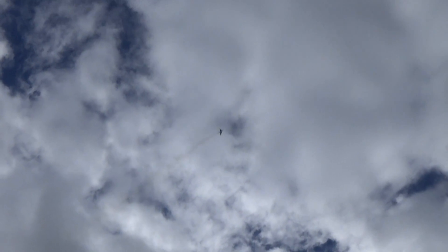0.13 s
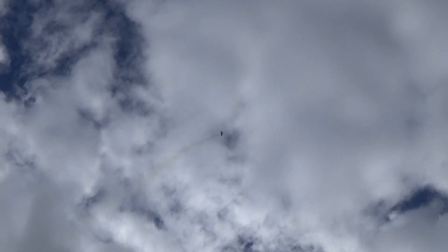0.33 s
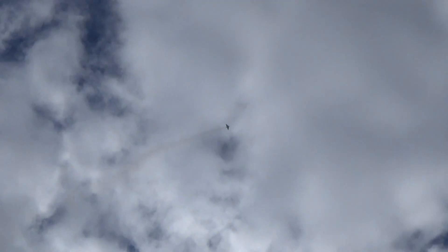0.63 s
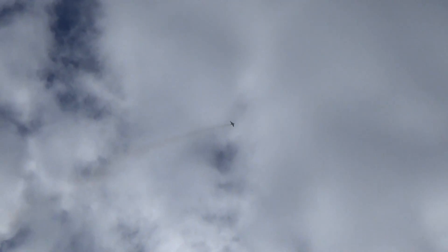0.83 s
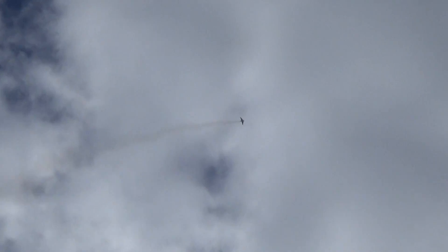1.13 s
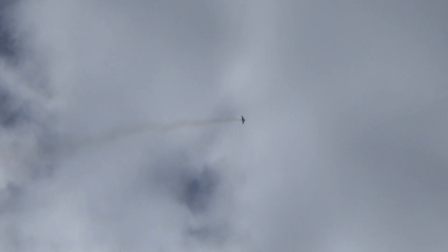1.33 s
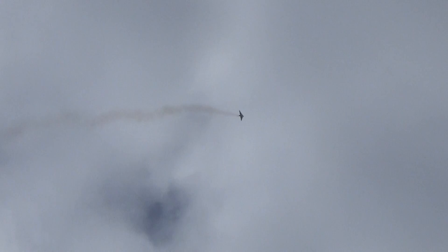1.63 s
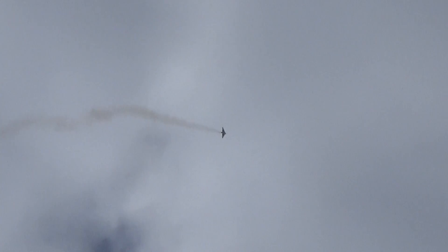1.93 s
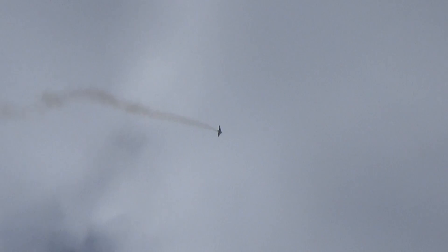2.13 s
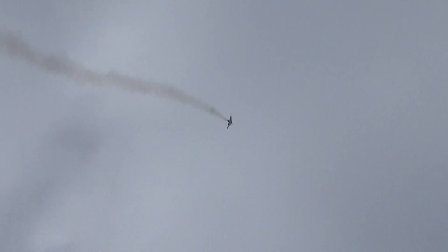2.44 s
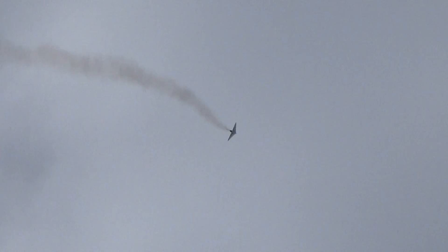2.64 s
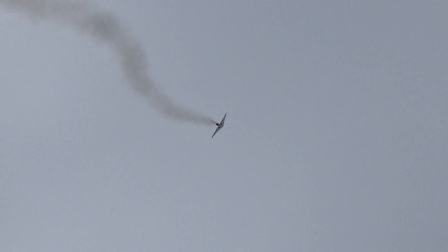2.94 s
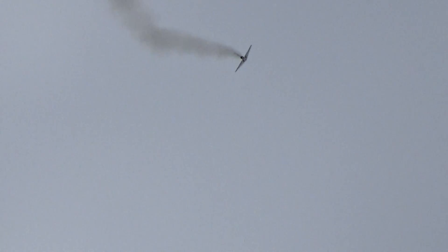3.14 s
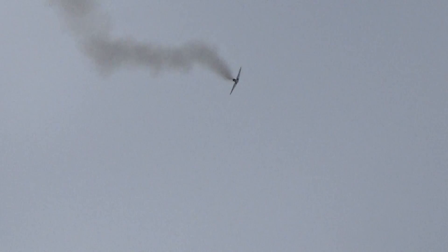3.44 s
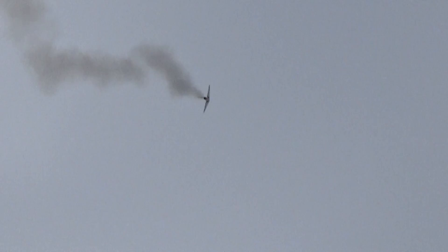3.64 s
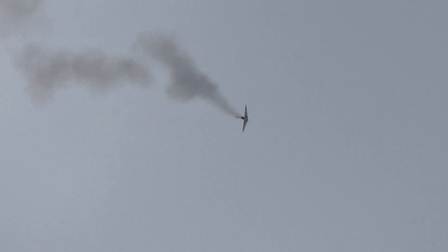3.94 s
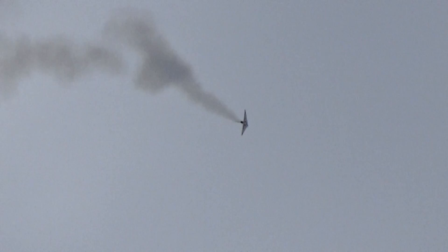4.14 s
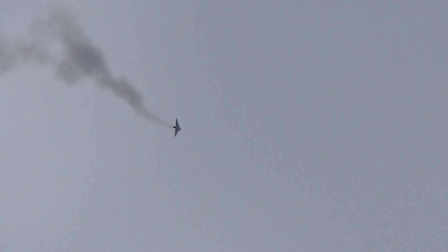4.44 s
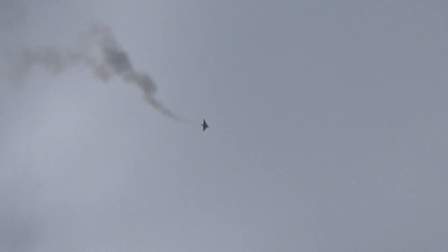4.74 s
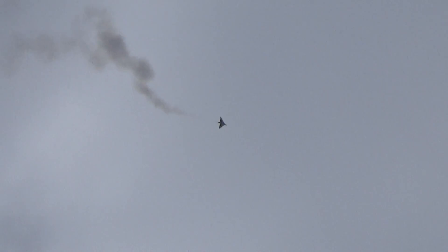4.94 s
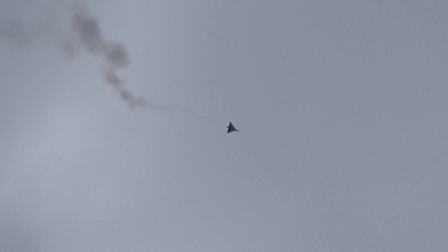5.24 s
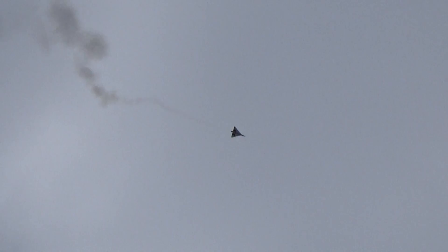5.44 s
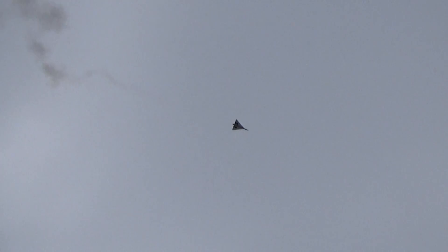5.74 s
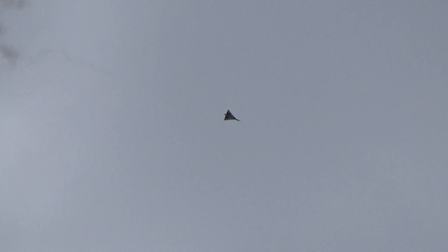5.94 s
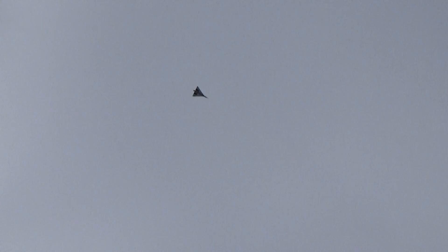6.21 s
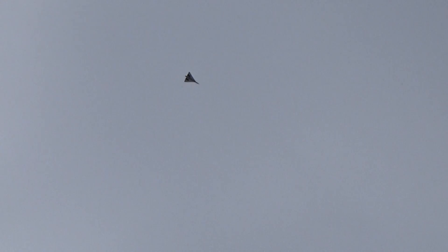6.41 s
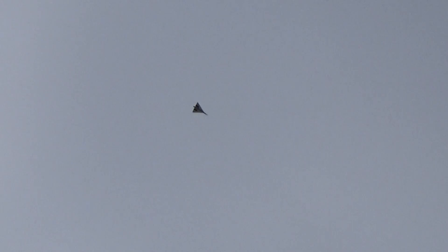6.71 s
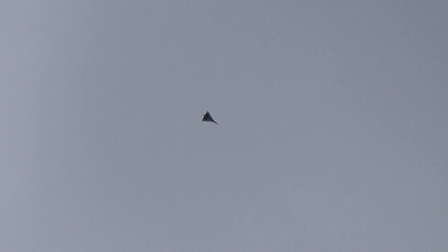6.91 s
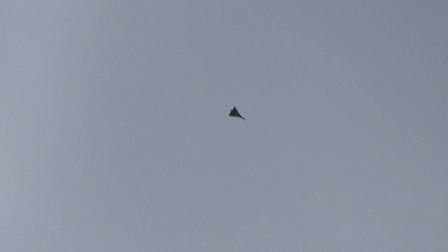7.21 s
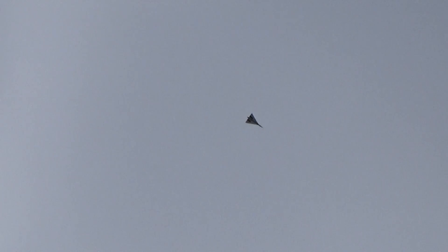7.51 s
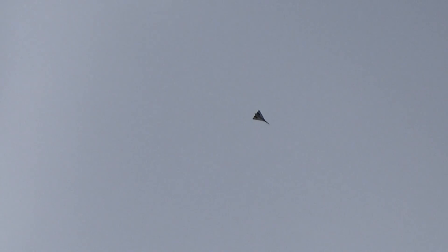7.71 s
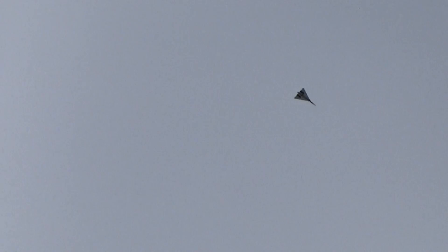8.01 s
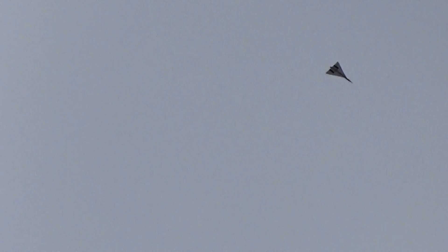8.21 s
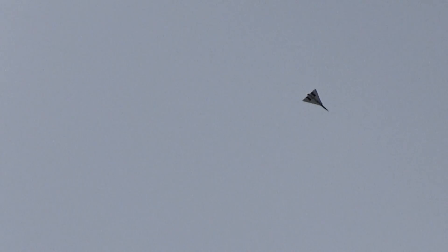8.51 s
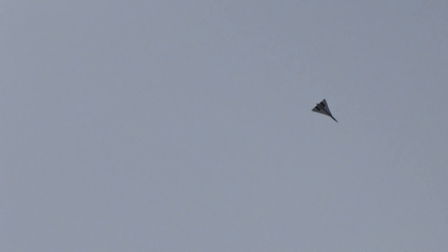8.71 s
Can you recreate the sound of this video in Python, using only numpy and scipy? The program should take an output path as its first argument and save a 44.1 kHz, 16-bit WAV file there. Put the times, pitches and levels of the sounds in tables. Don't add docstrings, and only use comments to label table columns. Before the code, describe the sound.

Outdoors in an open field, a small rocket glider high overhead burns with a bright, crackling hiss, wavering as it rocks. Sharp pops spit from the motor, which chuffs and dies soon after five seconds. Low wind buffets thump the handheld camera's stereo microphones, a hard plastic knock lands near eight seconds, and small birds whistle faintly over distant road roar and soft hiss.

```python
import sys
import numpy as np
from scipy import signal
from scipy.fft import rfft, irfft, next_fast_len
from scipy.io import wavfile
from scipy.ndimage import uniform_filter1d

SR = 44100
rng = np.random.default_rng(int(sys.argv[2]) if len(sys.argv) > 2 else 0)


def decibels_to_gain(level_db):
    exponent = np.asarray(level_db, float) / 20
    return 10 ** exponent


def inscribe(sig):
    pcm = np.round(np.clip(np.atleast_2d(sig).T, -1, 1) * 32767)
    wavfile.write(sys.argv[1], SR, pcm.astype(np.int16))


N = 390726
T = np.arange(N) / SR
HZ = np.maximum(np.fft.rfftfreq(N, 1 / SR), 1)


def level(x):
    return x / np.sqrt(np.mean(x ** 2))


def along(points, hz):
    f, v = np.transpose(points)
    return np.interp(np.log(hz), np.log(f), v)


def curves(rows):
    s, *columns = np.transpose(rows)
    return [np.interp(T, s, c) for c in columns]


def walk(rate):
    hold = int(SR / rate)
    steps = np.repeat(rng.standard_normal(N // hold + 1), hold)
    return level(uniform_filter1d(uniform_filter1d(steps, hold), hold)[:N])


def bands(x, colour, centres):
    spectrum = rfft(x) * decibels_to_gain(along(colour, HZ))
    parts = []
    for row in np.eye(len(centres)):
        weight = along(list(zip(centres, row)), HZ)
        parts.append(irfft(spectrum * weight, N))
    return parts


def coloured(colour):
    return level(bands(rng.standard_normal(N), colour, [1000])[0])


def band_rms(x, lo_hz, hi_hz):
    inside = (HZ > lo_hz) & (HZ < hi_hz)
    return np.sqrt(2 * np.sum(np.abs(rfft(x)[inside]) ** 2)) / N


def add(out, s, sound):
    i = int(s * SR)
    out[i:i + len(sound)] += sound[:N - i]


# t/s, level/dB, brightness/dB
JET_COURSE = [(0, -37.5, 0), (.25, -37, 2.5), (.9, -38, -1), (1.5, -39.5, -1.5), (2.2, -39.5, -2),
              (2.6, -37.5, -3), (2.86, -42, -6), (3.08, -40, -4), (3.42, -42.5, -2), (3.7, -42, -1.5),
              (4.03, -44.5, -2.5), (4.24, -39, -5.5), (4.5, -42.5, 2), (4.8, -45, 1), (5.04, -45.5, 3),
              (5.19, -55, -4.5), (5.34, -68, 4), (5.7, -82, 3)]
# f/Hz, density/dB per Hz
JET_SPECTRUM = [(300, -27), (900, -23), (1500, -13), (2300, -11), (2600, -12.5), (3000, -4), (3450, -8.5),
                (4600, -5), (5200, -6.5), (7000, -6), (8300, -2), (9900, -1), (11500, -7.5), (15600, -30.5)]
# f/Hz, gain/dB per dB of brightness
JET_BEAM = [(1800, 0.06), (3200, 0), (5200, 0.66), (6900, 0.4), (9300, 1), (14000, 0.95)]
# f/Hz, gain/dB per s
AIR_LOSS = [(1800, 0.6), (3200, 0), (5200, 0), (6900, -1), (9300, -1.5), (14000, -5)]
# t/s, swell/dB
JET_SWELLS = [(.38, 1.5), (.73, 3.5), (1.01, -2.5), (1.09, 3.5), (1.21, -1.5), (1.29, 3), (1.42, 2),
              (1.56, 2), (1.69, 4.5), (1.79, -1.5), (1.9, 3), (2.01, -2.5), (2.13, 4.5), (2.21, -1.5),
              (2.32, 2.5), (2.47, 6), (3.03, 2.5), (3.13, 2), (3.3, 3), (3.44, -3), (3.75, 2), (4.19, -3.5),
              (4.48, 4.5), (4.82, -2), (4.96, 3.5), (5.13, 5), (5.2, 9), (5.27, 6), (5.41, 7), (5.56, 5)]
# f/Hz, share/1
SWELL_SHARE = [(2600, 0), (4500, .3), (6500, .9), (10000, 1), (14000, 1.4)]
# t at 10 kHz/s, delay/s per octave down, width/s, depth/dB
WING_SHADOW = (5.04, .12, .035, -13)


def jet():
    level_db, bright_db = curves(JET_COURSE)
    shocks_per_s = 900
    shocks = (rng.random(N) < shocks_per_s / SR) * decibels_to_gain(3.19 * rng.exponential(size=N))
    shocks = shocks * rng.choice([-1, 1], N)
    source = rng.standard_normal(N) * decibels_to_gain(0.63 * walk(140)) + 1.14 * shocks
    centres = 500 * 2 ** (np.arange(16) / 3)
    swell_s, air_from_s = .045, .6
    swell_db = sum(db * np.exp(-((T - s) / swell_s) ** 2) for s, db in JET_SWELLS)
    parts = bands(source, JET_SPECTRUM, centres)
    flutter = walk(11)
    scale = band_rms(sum(parts), 2600, 6000)
    shadow_s, lag_s, width_s, depth_db = WING_SHADOW
    out = 0
    for hz, part in zip(centres, parts):
        shadow_at = shadow_s + lag_s * np.log2(1e4 / hz)
        shadow_db = depth_db * np.exp(-((T - shadow_at) / width_s) ** 2) * (hz > 5500)
        db = along(JET_BEAM, hz) * bright_db + along(AIR_LOSS, hz) * (T - air_from_s)
        db = db + along(SWELL_SHARE, hz) * swell_db + shadow_db
        db = db + .4 * flutter + .7 * walk(10)
        out = out + part * decibels_to_gain(db)
    burnout = np.clip((JET_COURSE[-1][0] - T) / 0.2, 0, 1)
    return out / scale * decibels_to_gain(level_db) * burnout


# t/s, peak level/dB,
# low f/Hz, high f/Hz, decay t60/s
CRUMBS = [(.07, -34, 600, 2500, .04), (.635, -32, 1100, 3500, .03), (1.42, -25, 1300, 5000, .025),
          (1.779, -34, 600, 1500, .02), (2.346, -25, 1500, 5000, .015), (2.646, -21, 1500, 8000, .012),
          (2.650, -18, 1500, 6500, .03), (2.703, -15.5, 1800, 8500, .003), (2.767, -22.5, 1500, 5500, .022),
          (2.836, -31, 900, 3000, .012), (2.929, -35, 1000, 3000, .01), (2.996, -28.5, 480, 1800, .014),
          (3.045, -21, 1600, 5500, .015), (3.473, -24, 1000, 4000, .015), (3.59, -28, 1500, 6000, .01),
          (4.189, -29, 1500, 6000, .01), (4.375, -26, 1200, 4000, .015), (4.906, -28, 1500, 6000, .01)]


def spits():
    out, t = np.zeros(N), np.arange(2000) / SR
    noises = rng.standard_normal((len(CRUMBS), len(t)))
    for (s, db, low, high, t60), noise in zip(CRUMBS, noises):
        attack = np.minimum(t / (.12 * t60), 1) ** 2
        burst = noise * attack * np.exp(-np.log(1000) * t / t60)
        band = signal.butter(3, [low, high], "band", fs=SR, output="sos")
        burst = signal.sosfilt(band, burst)
        add(out, s - 0.069 * t60, burst / np.abs(burst).max() * decibels_to_gain(db))
    return out


# t/s, echo lag/ms
ECHO_LAG = [(0, 9.6), (.75, 10.2), (1.3, 10.2), (2.2, 10.9), (4.2, 10.4), (5.7, 10.1)]


def ground(sky):
    lag = curves(ECHO_LAG)[0] * SR / 1000
    echo = np.interp(np.arange(N) - lag, np.arange(N), sky, left=0)
    return decibels_to_gain(-5.5) * signal.sosfilt(signal.butter(1, 1400, fs=SR, output="sos"), echo)


# t/s, level/dB, edge/dB
BREEZE_COURSE = [(0, -64.5, -25), (1.25, -66, -8), (1.6, -48, 3), (2.15, -39.5, 11.5), (2.6, -43.5, 1),
                 (3.15, -44.5, -3.5), (3.28, -61, -13), (3.75, -37, 7.5), (4.15, -62, -7),
                 (4.42, -46.5, 0.5), (5.25, -55, -15), (6.05, -36, 0), (6.46, -56, -11), (6.7, -34, -4),
                 (7.15, -36.5, 8.5), (7.38, -55, -16), (8.05, -30.5, -6.5), (8.86, -36, -3)]
# middle t/s, length/s, level/dB, edge/dB
BUFFET_EVENTS = [(0.743, 0.047, -52.5, -5), (1.076, 0.12, -56.5, -17), (1.407, 0.12, -53.5, -12),
                 (1.576, 0.054, -42.5, 3), (1.904, 0.041, -41.5, -3), (2.142, 0.033, -39, 10),
                 (2.89, 0.029, -44, -22), (3.32, 0.021, -47, -2.5), (3.5, 0.058, -41, -4.5),
                 (3.641, 0.022, -39, 7), (3.777, 0.041, -49, 9), (4.604, 0.033, -46, -5),
                 (4.818, 0.033, -43.5, -2), (5.072, 0.053, -43, 2), (5.39, 0.035, -36, -2),
                 (5.535, 0.16, -41.5, 2.5), (5.783, 0.045, -49, -23), (6.175, 0.074, -34, 2),
                 (6.26, 0.046, -41, -4), (6.82, .04, -49, -7), (7.017, 0.022, -31.5, 12),
                 (7.158, 0.017, -25.5, 10), (7.103, 0.023, -32, 6), (7.241, 0.032, -35, 3),
                 (7.58, .08, -42, -23), (7.915, 0.04, -31.5, -3), (8.215, 0.044, -30, -4),
                 (8.355, 0.026, -41, -1), (8.555, 0.034, -27, -2), (8.653, 0.031, -23.5, 6)]


def gusts():
    level_db, edge_db = curves(BREEZE_COURSE)
    power = decibels_to_gain(2 * level_db)
    edge = power * edge_db
    fall_db_s = 365
    for s, length, db, buffet_edge in BUFFET_EVENTS:
        outside_s = np.maximum(np.abs(T - s) - length / 2, 0)
        push = decibels_to_gain(2 * (db - fall_db_s * outside_s))
        power, edge = power + push, edge + push * buffet_edge
    return 10 * np.log10(power), edge / power


# f/Hz, density/dB per Hz
WIND_SPECTRUM = [(11, -61), (18, -18.5), (92, 3.5), (176, -3), (236, -8), (291, -14.5), (412, -21),
                 (500, -25.5), (650, -30), (1100, -120)]
# f/Hz, side minus mid level/dB
WIND_WIDTH = [(25, -11), (60, -9.5), (125, -4), (250, 3), (500, -1)]


def wind():
    level_db, edge_db = gusts()
    centres = 25 * 2 ** (np.arange(10) / 2)
    mid, other = (bands(rng.standard_normal(N), WIND_SPECTRUM, centres) for _ in range(2))
    lumps, thumps, out = walk(25), walk(45), 0
    for hz, m, o in zip(centres, mid, other):
        high = along([(110, 0), (190, .6), (300, 0.99)], hz)
        db = high * (edge_db + 1.8 * thumps) + 1.6 * lumps + 1.1 * walk(20)
        quarter_late = signal.hilbert(m, next_fast_len(N))[:N].imag
        side = decibels_to_gain(along(WIND_WIDTH, hz)) * (.65 * quarter_late + .65 * o)
        out = out + decibels_to_gain(db) * (m + side * np.array([[-1], [1]]))
    core = out.mean(axis=0)
    strength = np.sqrt(uniform_filter1d(core ** 2, size=int(.07 * SR)))
    return out / strength * decibels_to_gain(np.minimum(level_db, -24) - .6)


# t/s, peak level/dB, brightness/1
BODY_KNOCKS = [
    (7.848, -35, .85),
    (7.874, -47, .7),
    (8.158, -12, .58),
    (8.258, -35.5, .85),
]
# f/Hz, density/dB per Hz
SHELL_RESPONSE = [(240, -43), (400, -13), (653, 0), (1360, -4), (1630, -10), (2150, -2), (2840, -14),
                  (3850, -4), (4160, -9), (5560, -11), (7440, -23), (11800, -29), (15500, -46)]
# f/Hz, level/dB, t60/s
PANEL_MODES = [(673, -9, .048), (1039, -11, .045), (2180, -9, .026)]


def clicks():
    out, t = np.zeros(N), np.arange(2048) / SR
    hz = np.maximum(np.fft.rfftfreq(len(t), 1 / SR), 1)
    ring = 0
    for f, g, t60 in PANEL_MODES:
        ring = ring + decibels_to_gain(g) * np.sin(2 * np.pi * f * t) * np.exp(-np.log(1000) * t / t60)
    noises = rng.standard_normal((len(BODY_KNOCKS), len(t)))
    for (s, db, bright), noise in zip(BODY_KNOCKS, noises):
        shell = decibels_to_gain(along(SHELL_RESPONSE, hz) + 12 * (bright - .5) * np.log2(hz / 2000))
        rattle = rfft(noise * np.minimum(t / .002, 1) ** 3 * np.exp(-t / .0022))
        rattle /= np.sqrt(uniform_filter1d(np.abs(rattle) ** 2, size=25))
        sound = irfft(rattle * shell, len(t)) * np.clip(t / .001, 0, 1) * np.exp(-t / .01)
        sound = sound / np.abs(sound).max()
        sound = sound + 3.6 * (1 - bright) * ring * np.minimum(t / .006, 1) ** 2
        add(out, s - .0017, sound / np.abs(sound).max() * decibels_to_gain(db))
    return out


# start t/s, length/s, first f/Hz, middle f/Hz, last f/Hz
CLOSEST_BIRD = [
    (7.522, .028, 3650, 3450, 3150),
    (8.452, .06, 4980, 4300, 3350),
]
NEAR_BIRD = [(7.362, .045, 2950, 3150, 3150), (7.495, .032, 2250, 3000, 3300),
             (7.482, .03, 5750, 4450, 4850), (7.875, .215, 6100, 4800, 4400),
             (8.266, .057, 6350, 4900, 3900), (8.394, .07, 3550, 4850, 4900)]
MIDDLE_BIRD = [(7.622, .04, 5700, 5450, 5500), (7.74, .045, 4900, 4450, 3900),
               (8.144, .04, 3850, 3970, 4000), (8.352, .04, 6000, 5050, 4500),
               (8.72, .115, 4350, 4170, 4170)]
FAR_BIRD = [(6.66, .02, 5600, 5800, 5600), (6.685, .055, 4800, 5400, 5800), (7.345, .03, 2200, 2830, 3130),
            (7.56, .065, 5150, 5100, 5160), (7.635, .04, 2550, 2700, 2550), (7.79, .06, 5200, 5400, 5000),
            (8.52, .03, 5300, 5750, 5500), (8.835, .025, 5200, 5200, 5250)]
# start t/s, length/s, first f/Hz, last f/Hz, sweep rate/Hz, sweep f/Hz, level/dB
BUZZY_TRILL = (8.585, .19, 5300, 4500, 140, 900, -60.5)


def birds():
    out, waver = np.zeros(N), 1 + .004 * walk(150)
    flock = ((CLOSEST_BIRD, -58), (NEAR_BIRD, -61), (MIDDLE_BIRD, -64), (FAR_BIRD, -70))
    for notes, db in flock:
        for s, length, first, middle, last in notes:
            u = np.arange(int(length * SR)) / (length * SR)
            glide = np.polyfit([0, .5, 1], [first, middle, last], 2)
            hz = np.polyval(glide, u) * waver[int(s * SR):][:len(u)]
            shape = np.sin(np.pi * u ** 1.2) ** 0.51
            add(out, s, np.sqrt(2) * decibels_to_gain(db) * shape * np.sin(2 * np.pi * np.cumsum(hz) / SR))
    out = out * decibels_to_gain(1.5 * walk(130) - 1.5)
    s, length, first, last, rate, sweep, db = BUZZY_TRILL
    u = np.arange(int(length * SR)) / (length * SR)
    cycle = u * length * rate % 1
    hz = first + (last - first) * u + sweep * (2 * cycle - 1)
    shape = (np.sin(np.pi * u) * np.sin(np.pi * cycle)) ** .6
    add(out, s, np.sqrt(2) * decibels_to_gain(db) * shape * np.sin(2 * np.pi * np.cumsum(hz) / SR))
    tail = rng.standard_normal(2500) * np.exp(-np.arange(2500) / (.012 * SR))
    return out + decibels_to_gain(-33) * signal.fftconvolve(out, tail)[:N]


# t/s, level/dB
ROAD_COURSE = [(0, -89), (1.5, -59.5), (2.93, -62.5), (4.12, -58.5), (4.91, -56), (5.4, -51.5), (6.07, -52),
               (7.85, -46.5), (8.15, -44), (8.86, -43)]
# f/Hz, density/dB per Hz
ROAD_SPECTRUM = [(150, -11), (250, -2), (420, -5.5), (740, 1.5), (980, -2), (1300, -9), (1900, -16.5),
                 (2500, -22), (3500, -34), (5000, -50)]
# f/Hz, density/dB per Hz
RUMBLE_SPECTRUM = [(15, -7), (30, 1), (55, 7.5), (100, 2.5), (200, -53), (700, -91.5)]
# f/Hz, density/dB per Hz
HISS_SPECTRUM = [(1500, 0), (3000, 1), (5300, -1), (6800, -5.5), (9300, -4), (12000, -9), (15700, -11)]
# f/Hz, width/Hz, level relative to the road/dB
INSECT_LINE = (5250, 120, -32)


def field():
    road_db = curves(ROAD_COURSE)[0] - 4 * np.clip(1 - T / 3, 0, 1)
    centres = 300 * 2 ** (np.arange(8) / 2)
    mid, side = (
        sum(b * decibels_to_gain(0.39 * walk(5)) for b in bands(rng.standard_normal(N), ROAD_SPECTRUM, centres))
        for _ in range(2))
    scale = band_rms(mid, 500, 1000)
    hiss, hiss_side = (coloured([(700, -36)] + HISS_SPECTRUM) for _ in range(2))
    hiss_side = signal.sosfilt(signal.butter(4, 8500, fs=SR, output="sos"), hiss_side)
    hz, width, db = INSECT_LINE
    line = np.exp(-((HZ - hz) / width) ** 2)
    insect = level(irfft(rfft(rng.standard_normal(N)) * line, N)) * decibels_to_gain(db + 1.1 * walk(12))
    rumble, rumble_side = (coloured(RUMBLE_SPECTRUM) for _ in range(2))
    rumble = decibels_to_gain(0.5 - 1.15 * (T - 7)) * rumble
    centre = mid / scale + decibels_to_gain(-17.0) * hiss + insect + rumble
    apart = decibels_to_gain(-10) * side / scale + decibels_to_gain(-26) * hiss_side + decibels_to_gain(-9) * rumble_side
    return decibels_to_gain(road_db) * np.array([centre + apart, centre - apart])


# f/Hz, side minus mid level/dB
PORT_DIFFERENCE = [(1200, -34), (2300, -21.5), (3000, -28.5), (4100, -17), (5300, -30), (7000, -18.5),
                   (8500, -32.5), (10000, -34.5)]


def scene():
    roar, crumbs = jet(), spits()
    sky = roar + crumbs + ground(roar + .5 * crumbs)
    lagged = irfft(1j * rfft(sky) * decibels_to_gain(along(PORT_DIFFERENCE, HZ)), N) * decibels_to_gain(1.1 * T)
    knock = clicks()
    wide = lagged + decibels_to_gain(-11) * np.roll(knock, 5)
    return sky + knock + birds() + np.array([wide, -wide]) + wind() + field()


def mask_top(x, under_db):
    hz, _, z = signal.stft(x, SR, nperseg=2048)
    power = uniform_filter1d(np.mean(np.abs(z) ** 2, axis=0), size=24, axis=0)
    bright = power[(hz > 3000) & (hz < 11000)].mean(axis=0)
    heard = (power > bright * decibels_to_gain(-2 * under_db)) | (hz < 12000)[:, None]
    heard = np.cumprod(heard, axis=0)
    return signal.istft(z * heard, SR, nperseg=2048)[1][:, :N]


def low_pass(x):
    return signal.sosfilt(signal.butter(12, 15720, fs=SR, output="sos"), x)


def record(dry):
    finished = mask_top(dry, under_db=29)
    return low_pass(finished)


dry = scene()
out = record(dry)
inscribe(out)
```